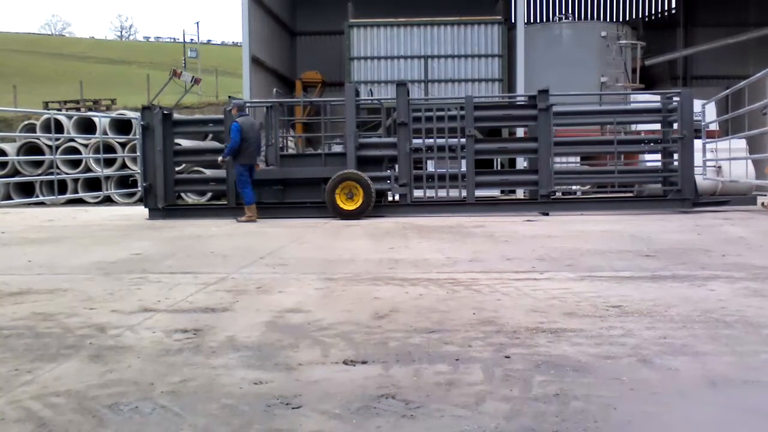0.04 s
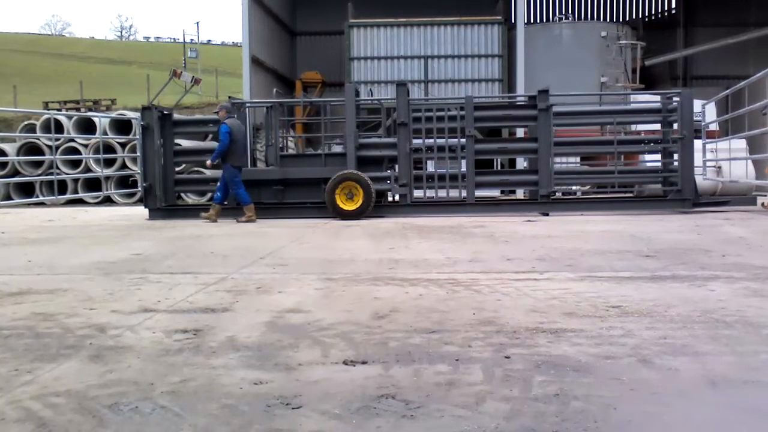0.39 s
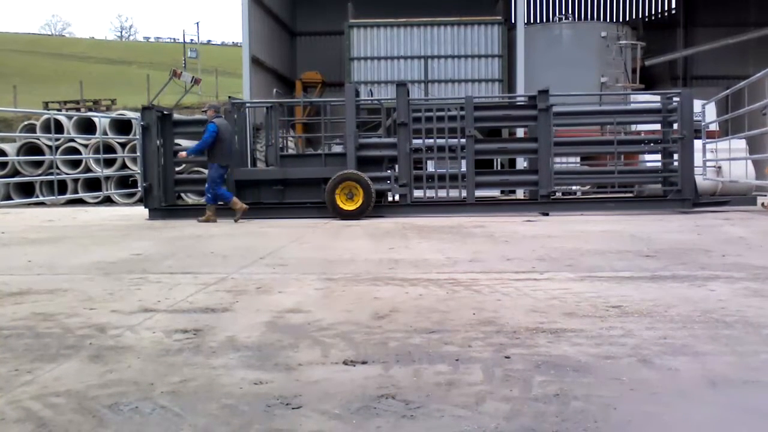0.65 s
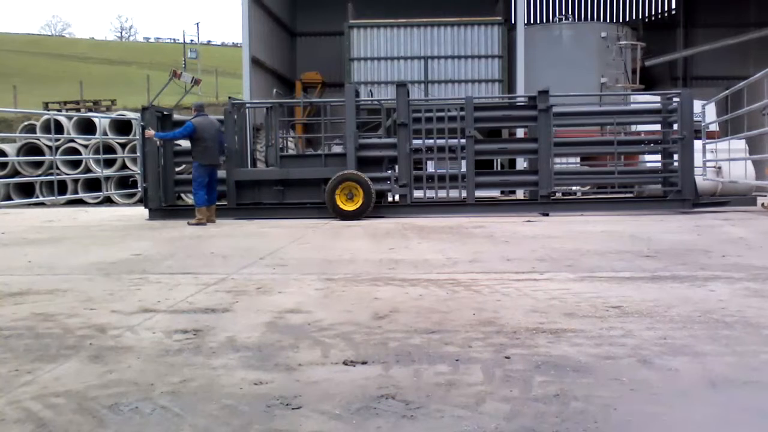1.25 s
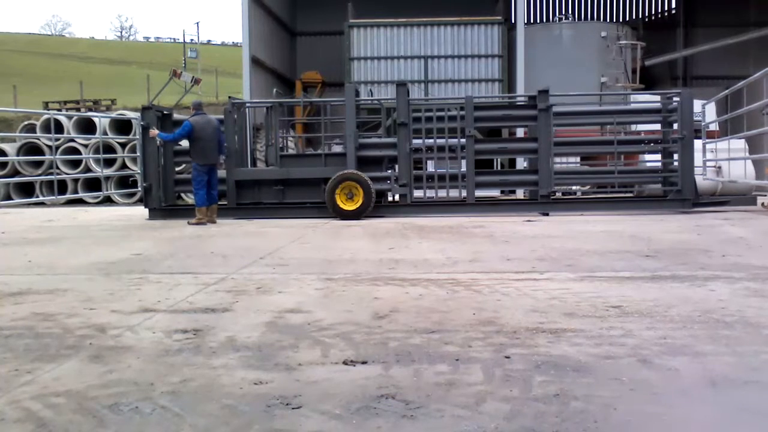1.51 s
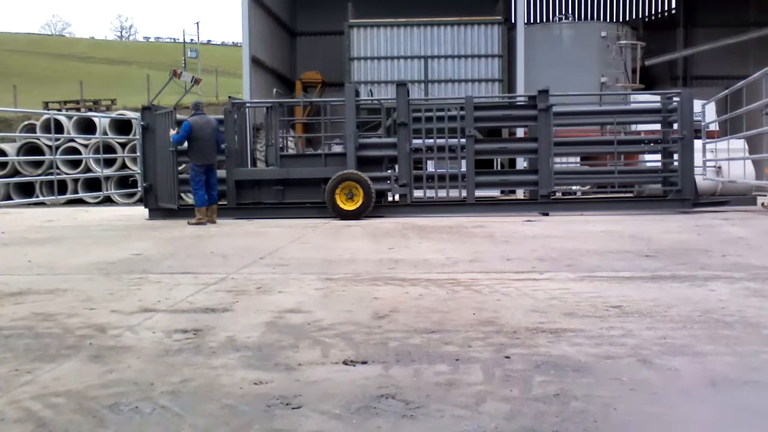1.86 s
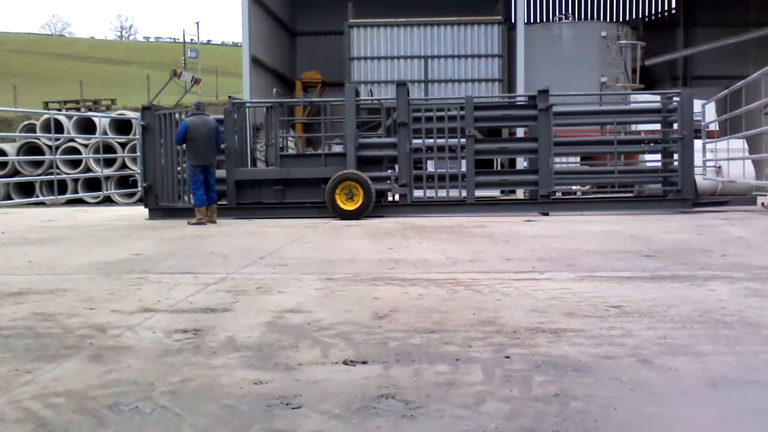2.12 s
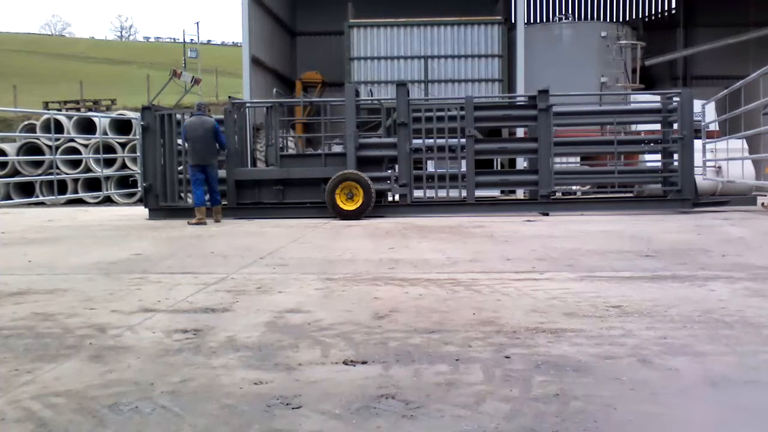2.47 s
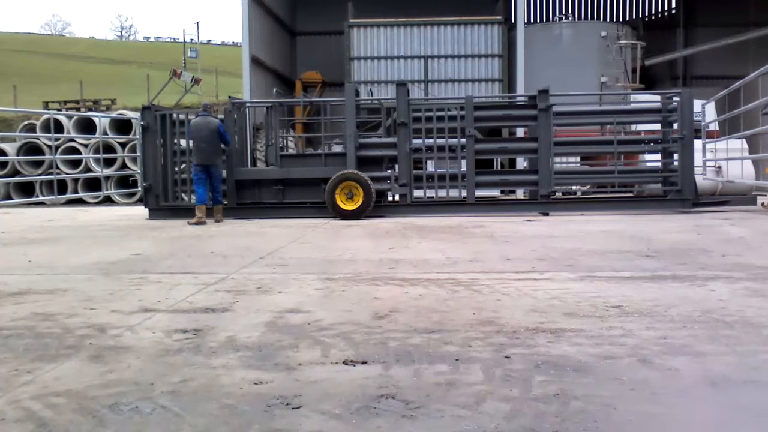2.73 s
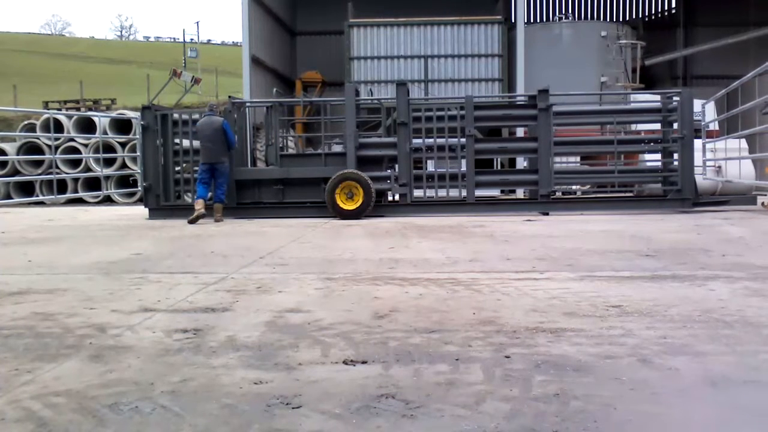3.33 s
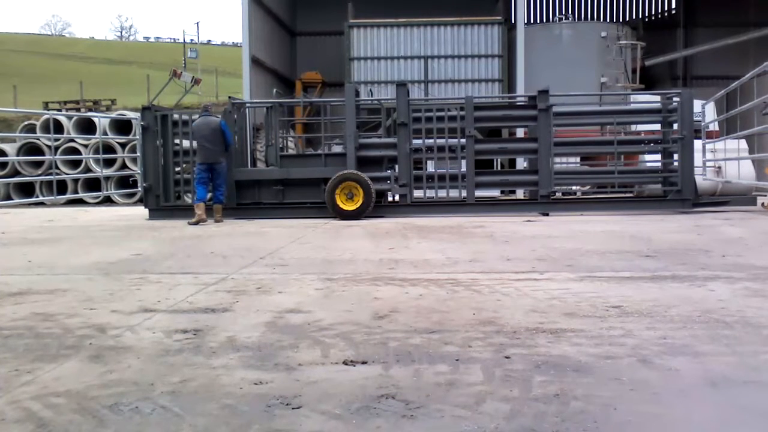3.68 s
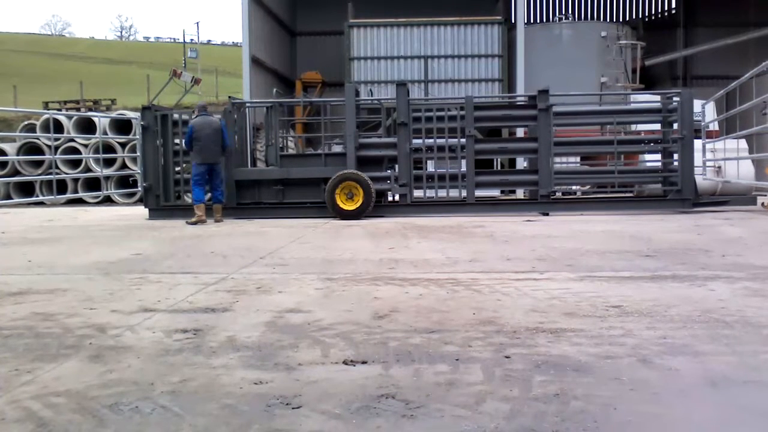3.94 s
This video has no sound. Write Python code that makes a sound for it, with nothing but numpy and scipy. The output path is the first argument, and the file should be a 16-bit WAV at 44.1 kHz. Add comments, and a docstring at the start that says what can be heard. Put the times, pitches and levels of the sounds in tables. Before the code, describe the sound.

A steel gate bangs shut in a windy yard. Faint boot steps and scuffs come in the first second or so, then a brief scrape along a rail at 1.5 seconds, as wind hisses and buffets the microphone. After a lull, the latch clinks near 3 seconds. The gate judders and slams loudly at 3.4 seconds, its frame ringing and fittings chattering under another rumbling gust.

```python
"""A concrete yard, with a steel gate on a cattle handling frame across it. Boots step and scuff, the gate
slides on its rail, and the latch is touched and knocked free. The gate judders along and slams into its
stop post; the whole tubular frame rings while loose fittings chatter, and a shed answers.
Gusts of wind hiss past and buffet the microphone over a distant outdoor murmur."""
import sys
import numpy as np
from scipy import signal
from scipy.fft import rfft, irfft, next_fast_len
from scipy.io import wavfile
from scipy.ndimage import map_coordinates

SR = 44100
rng = np.random.default_rng(int(sys.argv[2]) if len(sys.argv) > 2 else 0)


def materialize(psi):
    """Save the field psi as 16-bit PCM at rate SR to the path in sys.argv[1].

    A 1-D psi becomes a single channel; in a 2-D psi each row is a channel.
    """
    bounded = np.clip(np.atleast_2d(psi).T, -1, 1)
    quanta = np.round(bounded * 32767).astype(np.int16)
    wavfile.write(sys.argv[1], SR, quanta)


N = 176400
TOP_HZ = 13900

# Judder and slam. Each row: start in seconds, level in dB, brightness in dB per octave, attack in seconds.
FRAME_BLOWS = [(3.236, -35.5, 1, 0.001), (3.26, -24, -3.5, 0.0091), (3.312, -35.5, 0.5, 0.0023),
               (3.338, -36.5, -1, 0.0012), (3.364, -38, 0, 0.0059), (3.398, -19.5, -0.2, 0.00027),
               (3.424, -29, -0.5, 0.0026), (3.464, -28.5, -5, 0.0026), (3.59, -37, -6.5, 0.0037),
               (3.654, -33, -3, 0.01)]
# The frame's body tone. Each row: frequency in Hz, level in dB.
FRAME_COLOUR = [(70, 2), (180, -4), (300, 2.5), (540, -1), (800, 3), (1200, 0.5), (1700, -1), (2250, -7.5),
                (2700, -7), (3400, -14), (5000, -21), (8000, -19.5), (10000, -36), (14000, -64)]
# Its ring-out. Each row: frequency in Hz, seconds to fall 60 dB.
FRAME_T60 = [(250, 1.91), (900, 1.58), (1800, 1.22), (4000, 1.13), (9000, 0.21)]
# Its standout notes. Each row: frequency in Hz, boost in dB.
FRAME_MODES = [(239, 2.8), (333, 3.9), (366, 3.5), (444, 8.7), (474, 5.1), (622, 5.2), (755, 4),
               (1118, 6.1), (1205, 4.4), (1258, 3), (1630, 6.1), (1762, 6.4), (1941, 5), (2065, 6.5),
               (2540, 5.8), (2610, 5.7), (2765, 6), (3300, 3), (3750, 5.6), (3960, 4.5)]

def gate_frame():
    """The heavy tubular frame rings long under each blow."""
    return steel(FRAME_BLOWS, FRAME_COLOUR, FRAME_T60, FRAME_MODES, pivot_hz=823, spread=0.0037)


# The slam. Each row: start in seconds, level in dB, brightness in dB per octave, attack in seconds.
POST_BLOWS = [(3.398, -20.5, 0, 0.0006)]
# The post's midrange clang. Each row: frequency in Hz, level in dB.
POST_COLOUR = [(500, -22), (1100, 2), (1800, 5), (4500, -36)]
# Its standout notes. Each row: frequency in Hz, boost in dB.
POST_MODES = [(1280, 5), (1635, 13.5), (2750, 2)]

def stop_post():
    """The gate hits the post, which clangs and dies fast at all frequencies."""
    t60_s = 0.42
    return steel(POST_BLOWS, POST_COLOUR, [(1, t60_s)], POST_MODES, pivot_hz=1500, spread=0.013)


# Latch knocks. Each row: start in seconds, level in dB, brightness in dB per octave, attack in seconds.
BAR_BLOWS = [(2.976, -38, 1, 0.00058), (3.008, -45.5, -3.5, 0.0027), (3.064, -49, 1.5, 0.002),
             (3.165, -47.5, -1, 0.006)]
# The bar's body tone. Each row: frequency in Hz, level in dB.
BAR_COLOUR = [(100, -19), (220, -3), (500, -4.5), (850, 1), (1300, -7), (1850, -9.5), (2700, -7.5),
              (3300, -13), (3950, -12), (4400, -20.5), (5800, -16), (8000, -17), (12000, -31), (14000, -45)]
# Its ring-out. Each row: frequency in Hz, seconds to fall 60 dB.
BAR_T60 = [(300, 0.89), (1000, 2.5), (4000, 1.67), (7000, 0.34), (12000, 0.38)]
# Its standout notes. Each row: frequency in Hz, boost in dB.
BAR_MODES = [(760, 6.5), (1112, 14.6), (1160, 13), (1402, 9.3), (1468, 9), (1700, 13), (2058, 12.5),
             (2170, 7.3), (2735, 10.5), (3745, 8.4), (4055, 14.3), (5250, 9.9), (5900, 10.5)]

def latch_bar():
    """The bar is knocked free and rings on."""
    return steel(BAR_BLOWS, BAR_COLOUR, BAR_T60, BAR_MODES, pivot_hz=1500, spread=0.0086)


# Clinks. Each row: start in seconds, level in dB, brightness in dB per octave, attack in seconds.
CLINKS = [(2.976, -49, 4, 0.0012), (3.236, -43.5, -17.5, 0.0034), (3.398, -44, -9, 0.0012),
          (3.43, -38, -9, 0.0014), (3.715, -56, -6, 0.0091)]
# Their bright sheen. Each row: frequency in Hz, level in dB.
CLINK_COLOUR = [(1000, -58.5), (4000, -8.5), (6000, -5), (7400, 5), (8600, 8), (9300, -14), (11700, -1.5),
                (13000, -26)]
# Their ring-out. Each row: frequency in Hz, seconds to fall 60 dB.
CLINK_T60 = [(4000, 1), (8000, 0.33), (12000, 0.3)]
# Their standout notes. Each row: frequency in Hz, boost in dB.
CLINK_MODES = [(5850, 15.4), (7000, 9.1), (7260, 7.9), (8400, 4.6), (10000, 18.3), (11500, 7.8)]

def fittings():
    """Loose steel fittings clink, high and short."""
    return steel(CLINKS, CLINK_COLOUR, CLINK_T60, CLINK_MODES, pivot_hz=7550, spread=0.0045)


# A light tap. Each row: start in seconds, level in dB, brightness in dB per octave, attack in seconds.
PIN_TAPS = [(2.876, -52, -0.5, 0.0043)]
# The pin's body tone. Each row: frequency in Hz, level in dB.
PIN_COLOUR = [(120, -5), (700, 0.5), (1700, -6), (2400, -9.5), (3100, -8), (4400, -22), (7500, -21.5),
              (12000, -42)]
# Its ring-out. Each row: frequency in Hz, seconds to fall 60 dB.
PIN_T60 = [(600, 1), (2000, 0.41), (5000, 0.99)]
# Its standout notes. Each row: frequency in Hz, boost in dB.
PIN_MODES = [(650, 10), (760, 9), (1631, 17), (2050, 21), (2790, 15.5), (7219, 8)]

def latch_pin():
    """The pin is tapped and rings faintly."""
    return steel(PIN_TAPS, PIN_COLOUR, PIN_T60, PIN_MODES, pivot_hz=1500, spread=0.017)


def steel(blows, colour, t60s, clusters, pivot_hz, spread):
    """Struck steel: a brief crack, then beating partials over a wash of weak modes.
    Brightness tilts about pivot_hz; spread widens the clusters of modes as they go up in pitch."""
    size, ripple_knots, partial_count = 51200, 170, 450
    t, hz = np.arange(size) / SR, np.fft.rfftfreq(size, 1 / SR)
    ripple = map_coordinates(rng.standard_normal(ripple_knots), [ripple_knots * np.sqrt(hz / TOP_HZ)])
    ripple_db = 3 * np.tanh(ripple) * np.minimum(hz / pivot_hz, 1)  # the wash is uneven
    body = amp(along(colour, hz) + ripple_db)
    body *= 1 + sum((amp(db) - 1) * bell(hz, f, 4.5 + spread * f) for f, db in clusters)
    places = (np.arange(partial_count) + rng.random(partial_count)) / partial_count
    bins = np.searchsorted(hz, TOP_HZ * places ** 2)
    share = 0.25 * hz ** 4 / (hz ** 4 + 900 ** 4)  # power in partials; below 900 Hz the rattle stays dense
    partials = np.sqrt(1 - share + share * np.bincount(bins, np.gradient(bins), len(hz)))
    octaves = np.log2(np.maximum(hz, pivot_hz / 4) / pivot_hz)
    crack = amp(-8) * noise(colour)[:size] * np.exp(-t / 0.0054)  # the contact itself
    crash = amp(1.5 * np.exp(-t / 0.038))  # a blow starts louder, then settles into its ring
    out = np.zeros(N + size)
    for start, db, bright, attack in blows:
        phases = np.exp(2j * np.pi * rng.random(len(hz)))
        modes = body * amp(bright * octaves) * phases / np.std(irfft(body, size))
        ring = fade(irfft(modes * partials, size), t60s)
        onset = 1 - np.exp(-t / attack)
        out[round(start * SR):][:size] += amp(db) * (ring + crack) * crash * onset
    chatter = amp(0.63 * wobble(rate=110))  # loose joints make the ring flutter
    return out[:N] * chatter


# Pushes along the rail. Each row: peak time in seconds, level in dB, half length in seconds.
SLIDES = [(1.36, -59.5, 0.054), (1.49, -48, 0.044), (1.6, -53, 0.033)]
# The scrape's tone. Each row: frequency in Hz, level in dB.
SLIDE_COLOUR = [(350, 2.5), (700, -7.5), (1100, 1.5), (1600, -7.5), (3000, -5), (4500, -12.5), (8500, -7.5),
                (13500, -24)]

def rail_slide():
    """The gate scrapes along its rail."""
    return rubbing(SLIDES, SLIDE_COLOUR, grit_db=1.2)


# Footfalls. Each row: start in seconds, level in dB, pitch in Hz.
STEPS = [(.3, -63, 1090), (.4, -63, 700), (0.714, -60, 1120), (2.055, -65.5, 1040)]
# Sole drags. Each row: peak time in seconds, level in dB, half length in seconds.
SCUFFS = [(.46, -72.5, 0.044), (1.018, -61, 0.0033), (1.035, -54.5, 0.012), (1.086, -46, 0.014),
          (1.157, -58, 0.035)]
# Their sandy tone. Each row: frequency in Hz, level in dB.
SCUFF_COLOUR = [(200, -2), (800, -7), (1150, -6), (1450, 0.5), (2000, -7.5), (2800, -6.5), (4200, -15),
                (8000, -13.5), (10000, -24), (13000, -32)]

def boots():
    """Soles scuff and knock softly on concrete."""
    out = rubbing(SCUFFS, SCUFF_COLOUR, grit_db=1.5)
    t60_s, attack_s = 0.13, 0.0017
    for start, db, hz in STEPS:
        age = np.maximum(np.arange(N) / SR - start, 0)
        knock = noise([(hz / 4, -20), (hz / 2, -12), (hz, 0), (hz * 1.13, -14), (hz * 4, -35)])
        out += knock * amp(db - 60 * age / t60_s) * (1 - np.exp(-age / attack_s))
    return out


def rubbing(strokes, colour, grit_db):
    """Gritty friction that swells and ebbs with each stroke."""
    t = np.arange(N) / SR
    swell = sum(amp(db) * bell(t, peak, half) for peak, db, half in strokes)
    return swell * noise(colour) * amp(grit_db * wobble(rate=400))


# The reverb tail. Each row: frequency in Hz, seconds to fall 60 dB.
YARD_T60 = [(200, 0.67), (2000, 1), (10000, 0.65)]

def yard(x):
    """The diffuse answer of the shed and the concrete."""
    build_up = 1 - np.exp(-np.arange(SR) / SR / 0.015)
    tail = fade(rng.standard_normal(SR), YARD_T60) * build_up
    return signal.fftconvolve(x, tail / np.linalg.norm(tail))[:N]


# Fader rides for deep rumble and quick flutter. Each row: time in seconds, relative level in dB.
RUMBLE_RIDE = [(0.0, -46.5), (0.72, -51.5), (0.81, -35.5), (1.08, -37), (1.22, -26), (1.35, -36),
               (1.76, -38.5), (2.23, -70), (2.29, -50.5), (2.77, -57.5), (2.99, -37.5), (3.11, -61),
               (3.23, -33), (3.42, -35), (3.54, -14.5), (3.59, -25), (3.68, -22.5), (3.7, -35), (3.79, -26),
               (4.0, -39.5)]
FLUTTER_RIDE = [(0.0, -74), (0.76, -60), (0.83, -45.5), (1.12, -38.5), (1.19, -28.5), (1.37, -47),
                (1.69, -54.5), (1.76, -49), (1.85, -57), (2.56, -91.5), (3.14, -55.5), (3.22, -27.5),
                (3.25, -32.5), (3.4, -40), (3.55, -33), (3.8, -32.5), (4, -53)]
# Their low-end weight. Each row: frequency in Hz, level in dB.
RUMBLE_COLOUR = [(10, -5), (28, 9), (45, -4), (70, -14.5), (150, -41.5), (600, -79)]
FLUTTER_COLOUR = [(25, -15), (65, 4.5), (110, -3.5), (170, -15), (300, -28.5), (700, -53), (2000, -82)]
# Single thumps of air. Each row: peak time in seconds, level in dB, pitch in Hz, half length in seconds.
EDDIES = [(0.818, -41.5, 43.7, 0.024), (1.238, -27.5, 85, 0.0067), (1.747, -41, 56, 0.018),
          (3.216, -29.5, 81.6, 0.0061), (3.545, -25, 27.6, 0.013), (3.796, -18.5, 50.4, 0.012)]

def wind_buffet():
    """Wind beats on the microphone: deep rumble, quicker flutter and single eddies."""
    t = np.arange(N) / SR
    rumble = noise(RUMBLE_COLOUR) * amp(curve(RUMBLE_RIDE) - 3 + 2 * wobble(rate=11))
    flutter = noise(FLUTTER_COLOUR) * amp(curve(FLUTTER_RIDE) - 0.5 + 2.6 * wobble(rate=29.81))
    out = rumble + flutter
    for peak, db, hz, half in EDDIES:
        swirl = noise([(hz / 3, -12), (hz, 0), (hz * 2, -9), (hz * 5, -36), (hz * 20, -80)])
        out += amp(db) * bell(t, peak, half) * swirl
    return out


# The gusts' fader ride. Each row: time in seconds, relative level in dB.
HISS_RIDE = [(0, -75), (.75, -85.5), (1, -64), (1.1, -58.5), (1.25, -59), (1.5, -58.5), (1.67, -60.5),
             (1.9, -69), (2.27, -86), (2.45, -81.5), (2.88, -82), (3.2, -62.5), (3.6, -57.5), (4, -59)]
# Their breathy tone. Each row: frequency in Hz, level in dB.
HISS_COLOUR = [(180, -7), (300, -2.5), (712, -6), (1980, -11.5), (2960, -12), (4200, -16), (8500, -15.5),
               (13700, -20.5)]

def wind_hiss():
    """Gusts hiss past; the recorder adds a thin, high whine that follows their level."""
    whine_hz = 12380
    recorder_whine = np.sin(2 * np.pi * whine_hz * np.arange(N) / SR + 3.2 * wobble(rate=220))
    hiss = noise(HISS_COLOUR) + amp(-13) * recorder_whine
    return hiss * amp(curve(HISS_RIDE) + 1 + 1.1 * wobble(rate=24.57))


# The background bed's fader ride. Each row: time in seconds, level in dB.
AIR_RIDE = [(0, -67), (1.9, -57), (2.25, -76.5), (2.8, -74.5)]
# Its dull tone. Each row: frequency in Hz, level in dB.
AIR_COLOUR = [(100, 3), (300, -10), (900, -12.5), (2000, -22.5), (6000, -24.5), (13000, -25.5)]

def distant_air():
    """A faint, wavering outdoor murmur."""
    return noise(AIR_COLOUR) * amp(curve(AIR_RIDE) + wobble(rate=8.12))


def amp(db):
    """Decibels to gain."""
    return 10 ** (np.asarray(db) / 20)


def bell(x, centre, half):
    """A Gaussian swell; half is its standard deviation."""
    return np.exp(-.5 * ((x - centre) / half) ** 2)


def along(points, hz):
    """Join (Hz, value) points on a log axis."""
    f, v = np.transpose(points)
    return np.interp(np.log(hz + 1), np.log(f + 1), v)


def curve(rows):
    """Join (seconds, value) points, one value per sample."""
    return np.interp(np.arange(N) / SR, *np.transpose(rows))


def wobble(rate):
    """A smooth random curve, rate knots a second."""
    return map_coordinates(rng.standard_normal(int(N * rate / SR) + 4), [np.arange(N) * rate / SR])


def noise(colour):
    """Coloured noise of rms 1."""
    gain = amp(along(colour, np.fft.rfftfreq(N, 1 / SR)))
    x = irfft(rfft(rng.standard_normal(N)) * gain, N)
    return x / np.sqrt(np.mean(x ** 2) + 1e-20)


def fade(x, t60s):
    """Each frequency dies at its own speed."""
    hz, t, spectra = signal.stft(x, SR, nperseg=256)
    decay = amp(-60 * t / along(t60s, hz)[:, None])
    return signal.istft(spectra * decay, SR, nperseg=256)[1][:len(x)]


def scene():
    """Gate and boots with the yard's reverb, and the wind dry on top, in mono."""
    gate = latch_pin() + latch_bar() + gate_frame() + stop_post() + fittings() + rail_slide()
    direct = gate + boots()
    reverb = amp(-18) * yard(direct)
    return (direct + reverb + wind_hiss() + wind_buffet() + distant_air())[None]


def record(dry):
    """A brick-wall cut of everything above TOP_HZ."""
    size = next_fast_len(N + SR // 2)
    passband = np.fft.rfftfreq(size, 1 / SR) < TOP_HZ
    return irfft(rfft(dry, size) * passband, size)[..., :N]


dry = scene()
out = record(dry)
materialize(out)
```